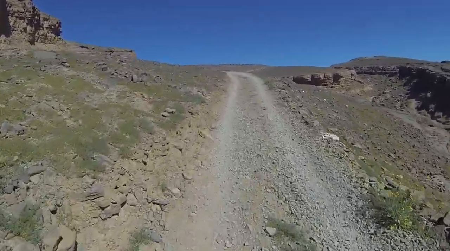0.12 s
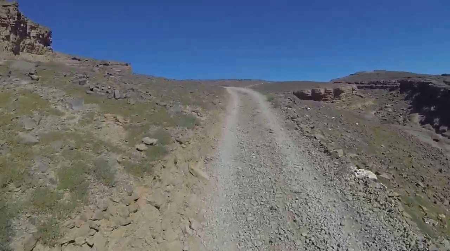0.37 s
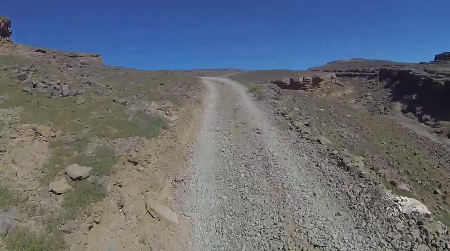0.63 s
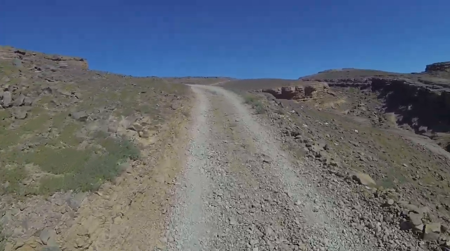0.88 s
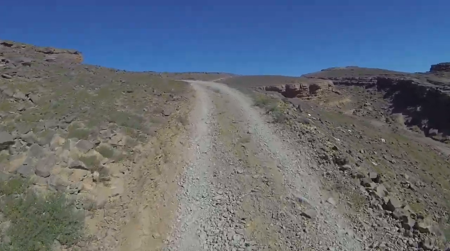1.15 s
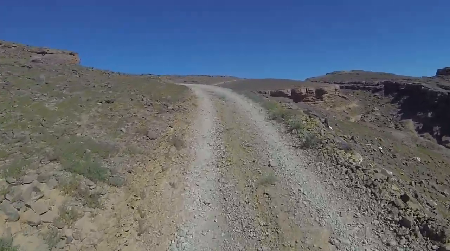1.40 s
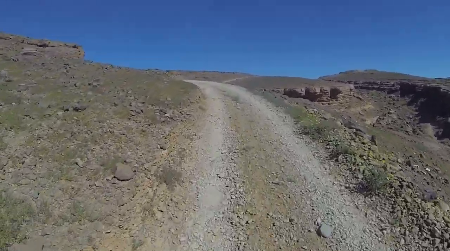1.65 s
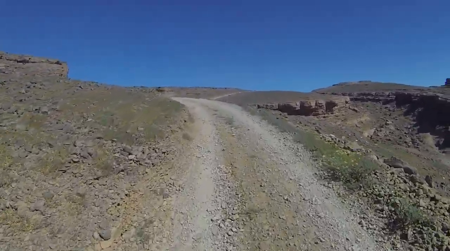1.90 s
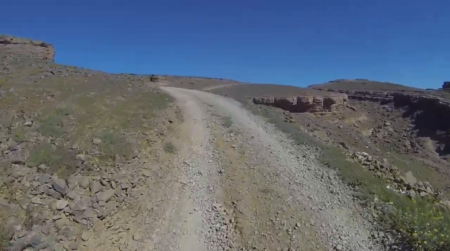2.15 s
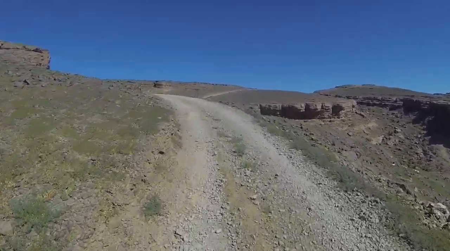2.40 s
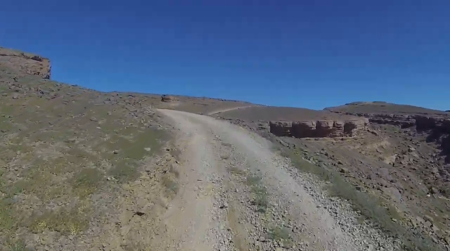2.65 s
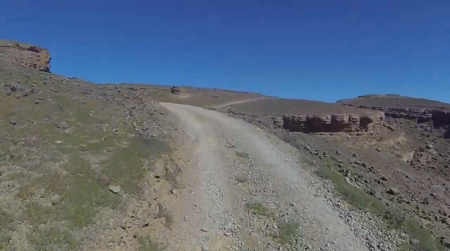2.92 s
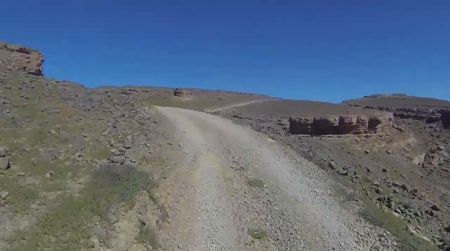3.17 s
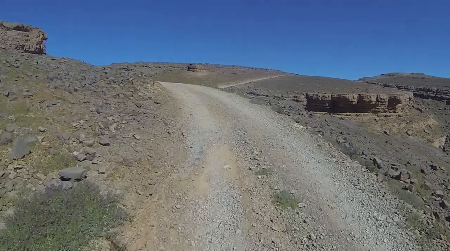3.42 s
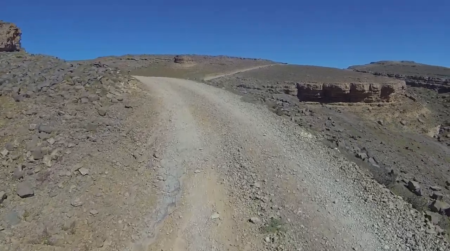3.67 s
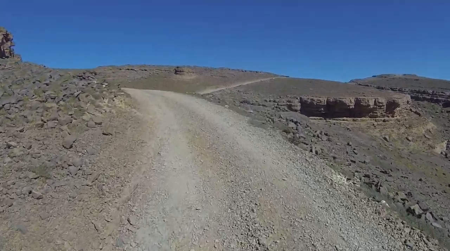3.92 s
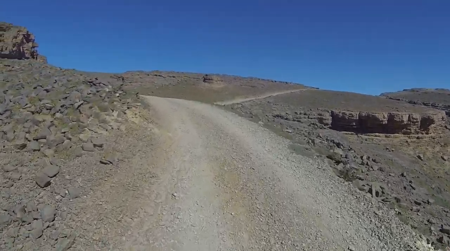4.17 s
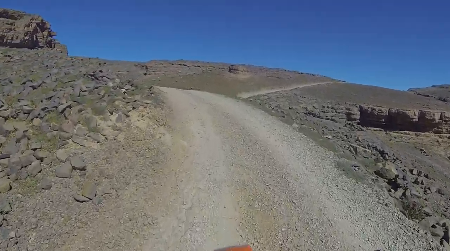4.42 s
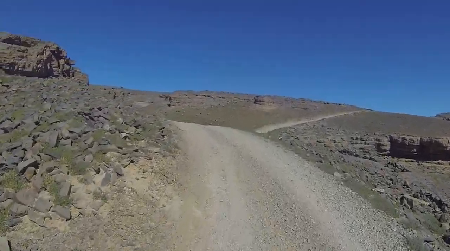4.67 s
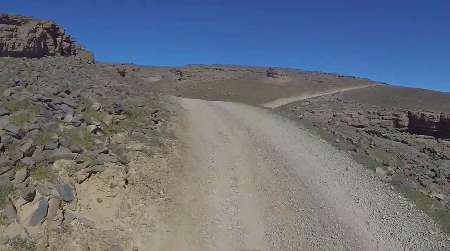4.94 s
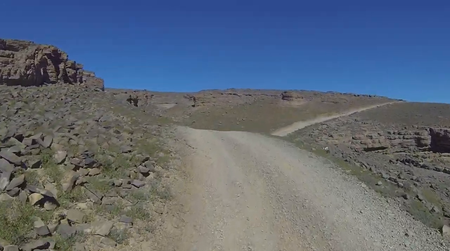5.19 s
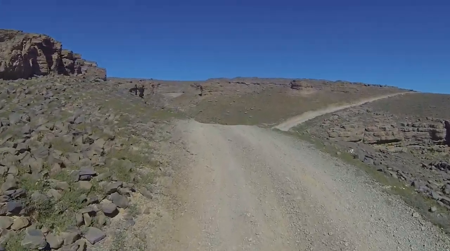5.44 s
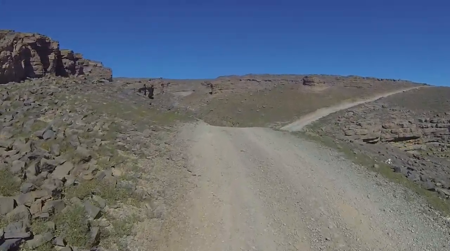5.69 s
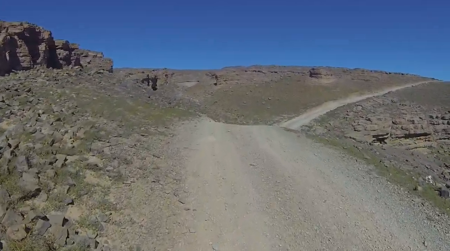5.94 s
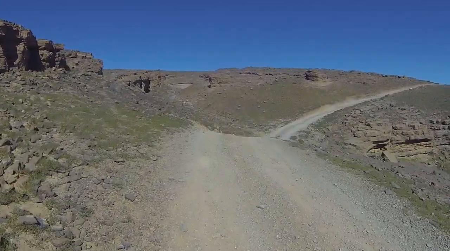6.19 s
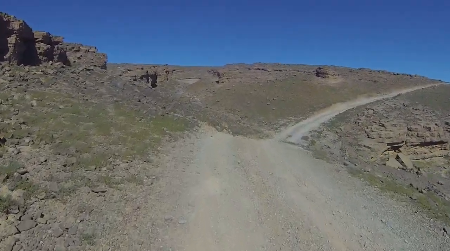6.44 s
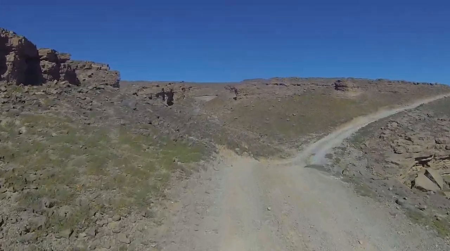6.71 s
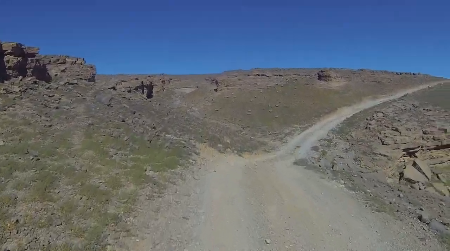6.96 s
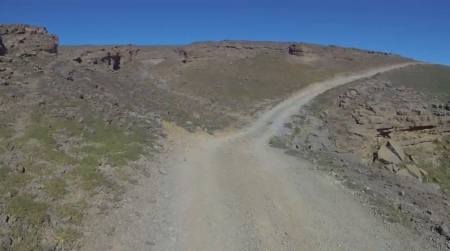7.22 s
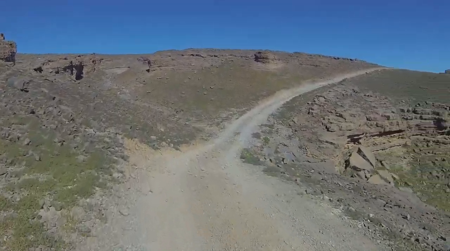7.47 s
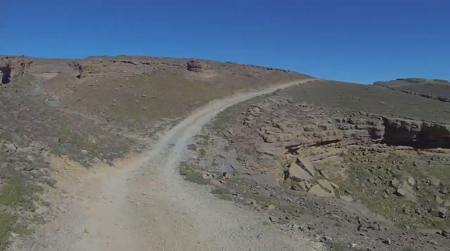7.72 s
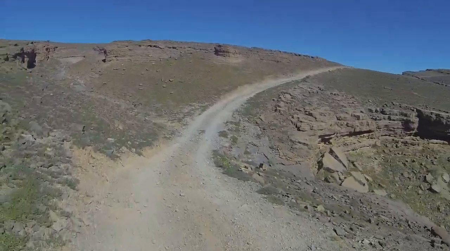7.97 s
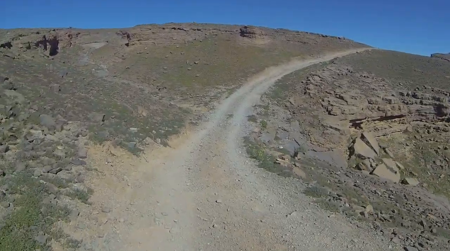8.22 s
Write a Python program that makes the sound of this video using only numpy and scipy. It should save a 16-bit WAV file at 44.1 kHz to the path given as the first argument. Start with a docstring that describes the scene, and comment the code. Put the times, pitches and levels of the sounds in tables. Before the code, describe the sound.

A motorcycle engine chugs throughout, heard from a microphone mounted on the bike, dry and without echo. Rapid rough exhaust bursts come first, then the throttle rises and falls as the revs sink, each firing becoming a distinct low thud. Loose gravel rumbles and rattles, stones click, and low knocks hit the frame. In the last stretch power is cut and the engine putters down with a hollow hum.

```python
"""A single-cylinder four-stroke motorcycle climbs a gravel track, slows and coasts, heard on board.
Each firing sets off short dying tones in the exhaust; a second pulse follows and damps the ring.
Under throttle, gas barks out as bursts of noise; the air intake gulps ahead of the next firing.
Below lie valve-gear clatter, tyre rumble, a buzzing panel and air-box hum, all made of filtered noise.
A few flung stones and knocks are brief bursts of noise, each around its own pitch."""
import sys
import numpy as np
from scipy import signal
from scipy.fft import rfft, irfft
from scipy.io import wavfile

SR = 44100
rng = np.random.default_rng(int(sys.argv[2]) if len(sys.argv) > 2 else 0)


def boost(x):
    """Linear amplitude factor 10**(x/20) for a level x in decibels (scalar or array-like)."""
    u = np.asarray(x, float) / 20
    return 10 ** u


def dump_mix(stems):
    """Bounce the given channels to the path in sys.argv[1] as a 16-bit WAV at rate SR."""
    frames = np.atleast_2d(stems).T  # one column per channel
    limited = np.clip(frames, -1, 1)  # hard clip at full scale
    pcm = np.round(limited * 32767).astype(np.int16)
    wavfile.write(sys.argv[1], SR, pcm)


N = 368235  # length of the sound in samples

# how fast the engine turns, from the first firing on: (t/s, speed/rpm)
SPEED = [(-0.0193, 2510.2), (0.21, 2732.2), (0.45, 2572.4), (0.51, 2782.1), (0.9, 3022.0), (1.89, 2788.5),
         (2.16, 2881.2), (2.24, 2694.8), (2.7, 2613.3), (2.91, 2411.3), (3.42, 2368.3), (3.49, 2214.5),
         (4.1, 2067.6), (4.52, 2118.4), (4.63, 1785.4), (4.8, 2386.4), (5.23, 1896.5), (5.59, 1978.9),
         (6.06, 1794.2), (6.13, 1745.5), (6.53, 1785.1), (6.78, 1633.2), (7.03, 1653.4), (7.48, 1488.1),
         (7.54, 1574.9), (8.4, 1441.7)]
# how it is ridden: (t/s, throttle/0-1, lugging/0-1 (labouring), exhaust strength/dB)
RIDE = [(0, 0.71, 0.8, -0.5), (.25, .95, 0.47, 1), (.75, 1, 0.06, -1), (1.1, .9, 0.3, -0.5),
        (1.3, 0.68, 0, -5), (1.55, 0.5, 0, -5), (1.8, 0.62, 0.16, -2), (2.13, 0.56, 0, 1.5),
        (2.3, 0.62, 0.32, -1), (2.7, 0.29, 0.4, -5), (3.0, 0.57, 0.88, 1.5), (3.25, 0.24, 0.74, -3),
        (3.75, 0.4, 0.84, 0.5), (4.25, 0.66, 0.86, 1.5), (4.6, 0.92, 1, 2), (4.85, 0.87, 0.86, 3),
        (5.05, 0.74, 0.95, 1.5), (5.25, 0.64, 1, -2), (5.6, 0.69, 0.92, 2.5), (6.1, 0.7, 0.98, -0.5),
        (6.68, 0.69, 0.96, 2), (6.74, 0, 0.7, -5), (7.05, 0, 0.3, -4.5), (7.3, 0, 0.18, -1),
        (7.75, 0, 0.23, 1), (8.35, 0, 0, 1)]
PUFF, GULP = 6, 7  # rows of the height table that bark() and intake() read
INTAKE_HZ = 571  # middle pitch of the air box


def in_time(rows, s):
    """Read each column of a table at the times s, on straight lines between its rows."""
    times, *columns = np.transpose(rows)
    return np.array([np.interp(s, times, column) for column in columns])


def rms_one(x):
    """Scale a sound to an average strength (rms) of 1."""
    return x / np.sqrt(np.mean(x ** 2) + 1e-20)


def drift(rate):
    """Smooth random wandering of spread 1; a higher rate (Hz) wanders faster."""
    r = np.exp(-80 * np.pi * rate / SR)  # one step is 40 samples
    draws = rng.standard_normal(N // 40 + 2002)
    slow = signal.lfilter([1], [1, -2 * r, r * r], draws)[2000:]
    return np.interp(np.arange(N) / 40, np.arange(len(slow)), rms_one(slow))


def band_noise(centre_hz, width_hz):
    """Noise through one narrow resonance, at rms 1."""
    edges = [centre_hz - width_hz / 2, centre_hz + width_hz / 2]
    sos = signal.butter(2, edges, "band", fs=SR, output="sos")
    return rms_one(signal.sosfilt(sos, rng.standard_normal(N)))


def coloured(x, spectrum, band):
    """Colour a noise by a spectrum, then scale it so that the part within the band (Hz, Hz) has rms 1."""
    hz = np.maximum(np.fft.rfftfreq(N, 1 / SR), 1)
    points = np.array(spectrum)
    colour_db = np.interp(np.log(hz), np.log(points[:, 0]), points[:, 1], left=-60, right=-120)
    bins = rfft(x) * boost(colour_db)
    inside = (hz > band[0]) & (hz < band[1])
    return irfft(bins, N) * N / np.sqrt(2 * np.sum(np.abs(bins[inside]) ** 2))


def lay(starts_s, shapes):
    """Sum short sounds, one per row, at their start times."""
    lead = SR // 10  # room for sounds that start before time 0
    first = np.round(starts_s * SR).astype(int)[:, None]
    at = first + np.arange(shapes.shape[1]) + lead
    return np.bincount(at.ravel(), shapes.ravel(), N + SR)[lead:lead + N]


def firings(jitter_s):
    """Times of all firings, one in two turns of the crank, each a little early or late by chance."""
    s = SPEED[0][0] + np.arange(N + SR // 20) / SR
    cycles = np.cumsum(in_time(SPEED, s)[0]) / (120 * SR)  # rpm / 120 = firings per second
    fired = np.interp(np.arange(int(cycles[-1]) + 1), cycles, s)
    return fired + jitter_s * rng.standard_normal(len(fired))


def by_throttle(values, s):
    """Read a value given for the throttle shut, half open and wide open."""
    return np.interp(in_time(RIDE, s)[0], [0, .5, 1], values)


def heights_db(s):
    """Height of every part of the exhaust note and intake, from throttle, lugging and strength."""
    # rows: thump, boom, knock, pipe pair, upper ring, second pulse, puff of gas, intake gulp
    # (level when shut/dB, when half open/dB, when wide open/dB, change when lugging/dB)
    response = [(-4.5, -8, -19.5, -4.5), (0.5, -16.5, -19, -8.5), (-20.5, -32, -34, 36), (9, 2.5, 4, 2.5),
                (-39, -17.5, -9.5, -6), (1.5, -2.5, -10, -4.5), (-65.5, -40.5, -29, 0),
                (-23.5, -49, -50, -4.5)]
    _, lugging, strength_db = in_time(RIDE, s)
    return np.array([by_throttle(row[:3], s) + row[3] * lugging + strength_db for row in response])


def rumble(turn, level_db, swell_db):
    """Tyres and frame shaking: low lumpy noise that swells once per engine cycle."""
    # colour of the low noise: (f/Hz, relative level/dB per Hz)
    rumble_spectrum = [(20, -7.5), (50, -5), (120, 5), (170, -2), (230, -0.5), (330, -2), (420, -5.5),
                       (560, -5.5), (700, -12), (900, -11), (1300, -26)]
    noise = coloured(rng.standard_normal(N), rumble_spectrum, (450, 1000))
    swell = swell_db * np.cos(2 * np.pi * (turn - .15))
    return boost(level_db + swell + 1.1 * drift(11)) * noise


def airbox(now):
    """Air drawn in hums through the air box's resonance, loudest with the throttle shut."""
    hum_db = by_throttle((-39.5, -49.5, -51), now)
    return boost(hum_db) * band_noise(INTAKE_HZ, width_hz=74)


def panel(now):
    """A panel buzzes: noise through one narrow resonance, loudest where the engine speed suits it."""
    best_rpm, range_rpm = 2400, 197
    off = (in_time(SPEED, now)[0] - best_rpm) / range_rpm
    level_db = -44.5 + 11.5 * np.exp(-off ** 2 / 2)
    return boost(level_db) * band_noise(695, width_hz=80)


def clatter(turn, level_db, swell_db, flicker_db):
    """Valve gear, chain and gravel: grainy hiss swelling once a cycle; low, middle and top flicker apart."""
    # colour of the hiss: (f/Hz, relative level/dB per Hz)
    clatter_spectrum = [(470, -45.5), (800, -13), (938, -5), (1030, 0), (1310, -6.5), (1420, -8),
                        (1890, -4.5), (2760, -14.5), (3160, -10.5), (4730, -23.5), (5150, -25.5),
                        (7530, -38), (8620, -33.5), (10700, -39), (15000, -55)]
    grain = rng.standard_normal(N) * boost(2.0 * drift(300))
    noise = coloured(grain, clatter_spectrum, (1200, 5000))
    low, upper = [signal.sosfiltfilt(signal.butter(2, hz, fs=SR, output="sos"), noise)
                  for hz in (2600, 6500)]
    parts = low, upper - low, noise - upper
    mixed = sum(part * boost(flicker_db * drift(15)) for part in parts)
    return boost(level_db + swell_db * np.cos(2 * np.pi * (turn - .15))) * mixed


def stones():
    """Stones and knocks against the frame: each is a dying burst of noise around its own pitch."""
    # (t/s, peak level/dB, f/Hz, relative width/1, time to die by 60 dB before filtering/s)
    stone_hits = [(1.913, -38.5, 9050, 0.37, 0.0063), (1.933, -48, 9550, .3, 0.0053),
                  (1.989, -30.5, 5230, 0.066, 0.041), (2.390, -9, 433, 0.27, 0.021),
                  (3.030, -41, 4000, 0.29, 0.025), (3.33, -22.5, 3010, 0.54, 0.12),
                  (3.530, -28, 3540, .2, 0.025), (3.383, -37.5, 9970, 0.19, 0.0033),
                  (4.807, -13, 420, 0.53, 0.017), (4.986, -48, 6000, 0.24, .01),
                  (5.263, -12.5, 393, 0.38, 0.0057), (5.549, -11.5, 397, 0.44, .02),
                  (6.582, -20.5, 890, 0.22, 0.011), (7.461, -51, 9800, 0.16, .03),
                  (7.850, -60, 10800, 0.072, .03), (7.927, -53, 11300, .05, 0.033),
                  (8.247, -57, 11200, 0.036, .03)]
    out, t = np.zeros(N), np.arange(SR // 20) / SR
    for s, db, hz, width, t60 in stone_hits:
        edges = [hz / (1 + width), hz * (1 + width)]
        sos = signal.butter(2, edges, "band", fs=SR, output="sos")
        burst = rng.standard_normal(len(t)) * boost(-60 * t / t60)
        burst = signal.sosfilt(sos, signal.sosfilt(sos, burst))
        out[round(s * SR):][:len(t)] += boost(db) * burst / np.abs(burst).max()
    return out


def intake(fired, lead, t60, rasp_db):
    """A short ring of the air box with a rasp of air, a share of the cycle ahead of the next firing."""
    begins = fired[1:] - lead * np.diff(fired)
    t = np.arange(SR // 6) / SR
    chance = rng.standard_normal((len(begins), 2, 1))
    pitch = INTAKE_HZ * (1 + 0.032 * chance[:, 0])
    height = boost(heights_db(begins)[GULP][:, None] + 0.58 * chance[:, 1])
    swelling = height * (1 - np.exp(-t / .002))
    ring = lay(begins, swelling * boost(-60 * t / t60) * np.sin(2 * np.pi * pitch * t))
    sos = signal.butter(3, [750, 1600], "band", fs=SR, output="sos")
    air = rms_one(signal.sosfilt(sos, rng.standard_normal(N)))
    return ring + air * lay(begins, swelling * boost(rasp_db - 60 * t / .3))


def bark(fired, hold, fade, uneven_db):
    """Turbulent gas leaves with each firing: a sharp front, then a puff that lasts a share of the cycle."""
    # colour of the gas noise: (f/Hz, relative level/dB per Hz)
    gas_spectrum = [(290, -34), (500, -4), (593, -6.5), (646, -15.5), (713, -3), (1300, -6.5), (2040, -4),
                    (2750, -16), (3090, -10), (3820, -16.5), (6020, -36), (10800, -47.5), (15000, -59.5)]
    # harder cracks of gas: (t/s, level above the neighbours/dB)
    hard_cracks = [(.12, 10), (.482, 2.5), (.53, 5), (.568, 3), (.611, 4.5), (.652, 3), (.694, 3.5),
                   (.735, 8), (.896, 3.5), (1.016, 5), (1.098, 4), (1.59, 9.5), (1.931, 3.5), (2.14, 0),
                   (2.77, 13), (3.064, 3), (3.259, 6), (4.2, 5), (4.607, 3), (4.675, 1.5), (4.784, 3),
                   (4.837, 0.5)]
    crack_spread_s = .03
    t = np.arange(SR // 10) / SR
    share = t / np.gradient(fired)[:, None]  # of one cycle
    puff = boost(-60 * np.maximum(share - hold, 0) / fade)
    puff = puff * (1 - np.exp(-t / .0003)) * (1 + .6 * np.exp(-t / .003))  # sharp front
    chance = rng.standard_normal((len(fired), 1))
    extra_db = sum(db * np.exp(-((fired - s) / crack_spread_s) ** 2) for s, db in hard_cracks)
    puff_db = (heights_db(fired)[PUFF] + extra_db)[:, None] + uneven_db * chance
    gate = lay(fired + 0.00066, puff * boost(puff_db))

    grain = rng.standard_normal(N) * boost(2.1 * drift(310))
    gas = coloured(grain, gas_spectrum, (1200, 5000))
    body = signal.sosfiltfilt(signal.butter(2, 3000, fs=SR, output="sos"), gas)
    lugging = in_time(RIDE, np.arange(N) / SR)[1]
    rasp_db = -1 * lugging + 1 * drift(7.6)  # the treble wanders and is duller when lugging
    return gate * (body + boost(rasp_db) * (gas - body))


def exhaust(fired, uneven_db, detune):
    """Dying tones (modes) per firing; the hot ones die fast once the second pulse has passed."""
    # (f/Hz before heating, time to die by 60 dB/s before throttle scaling, start/ms, sign/+-1,
    # added level/dB, height row/number, follows gas heat/0-1, struck by the second pulse/0-1)
    modes = [(44.1, .116, 7.0, -1, 0, 0, 0, 1), (85.8, .095, 1.3, 1, 0, 1, 0, 0),
             (130, .021, 3.1, 1, 0, 2, 1, 0), (201, .049, -1.27, -1, 0, 3, 1, 0),
             (230.5, .040, -1.13, 1, -3, 3, 1, 0), (336, .10, -2.87, -1, 1, 4, 1, 0),
             (364, .07, -2.87, -1, -7, 4, 1, 0), (80.9, .058, 0, 1, 0, 5, 0, 1),
             (235, .05, 1.8, 1, -9, 1, 0, 1)]
    # pitch of the pipe as the gas heats and cools: (t/s, f/Hz)
    pipe_pitch = [(0.0, 266), (0.04, 265.7), (0.67, 252.7), (1.02, 270.6), (1.51, 267.5), (1.6, 272),
                  (3.49, 253.8), (3.53, 242.7), (5.16, 245.6), (5.32, 241.7), (6.7, 237.6), (6.86, 230),
                  (8.28, 249.5), (8.35, 226)]
    # how the hot tones' dying time scales: (when shut/1, when half open/1, when wide open/1)
    ring_length = (0.51, 0.94, 0.71)
    # wait for the second pulse, in shares of a cycle: (when shut/1, when half open/1, when wide open/1)
    lag_share = (.222, .19, .165)
    rise_s, shut_ms, shut_per_s = .001, 12, 790  # shut: the extra damping after the second pulse
    heat = in_time(pipe_pitch, fired).T / 201.9  # against the cold pipe's pitch in Hz
    length = by_throttle(ring_length, fired)[:, None]
    lag_ms = 1000 * (by_throttle(lag_share, fired) * np.gradient(fired))[:, None]
    level_db = heights_db(fired)[..., None]
    early = .008  # s; some modes start before the firing time
    age = np.arange(SR // 6) / SR - early
    shut = np.exp(-shut_per_s * np.maximum(age - (lag_ms + shut_ms) / 1000, 0))
    strength = rng.standard_normal((len(fired), 1))  # chance shared by all modes of a firing
    out = 0
    for hz, t60, start_ms, sign, db, row, hot, second in modes:
        chance = rng.standard_normal((len(fired), 2, 1))
        t = np.maximum(age - (start_ms + second * lag_ms) / 1000, 0)
        pitch = hz * heat ** hot * (1 + detune * chance[:, 0])
        decay = boost(-60 * t / (t60 * length ** hot)) * shut ** hot
        envelope = (1 - np.exp(-t / rise_s)) * decay
        height = sign * boost(db + level_db[int(row)] + uneven_db * (strength + chance[:, 1]))
        out = out + height * envelope * np.sin(2 * np.pi * pitch * t)
    return lay(fired - early, out)


def scene():
    """Mix all the layers; those tied to the engine share one crank."""
    # roughness of the track, heard as clatter: (t/s, level before a small lift/dB)
    track = [(0.0, -35.5), (0.39, -42), (0.74, -37.5), (1.3, -39.5), (2.04, -35.5), (2.44, -37),
             (3.37, -36), (4.02, -41.5), (4.47, -42.5), (4.84, -40.5), (5.18, -42), (6.93, -45.5),
             (7.49, -42), (8.35, -41)]
    # change of the rumble: (when shut/dB, when half open/dB, when wide open/dB)
    rumble_change = (-0.5, 0.4, -0.4)
    now = np.arange(N) / SR
    fired = firings(jitter_s=0.00029)
    turn = np.interp(now, fired, np.arange(len(fired)))  # engine cycles so far
    lugging = in_time(RIDE, now)[1]
    track_db, = in_time(track, now)
    rumble_db = -34.5 + 0.69 * (track_db - track_db.mean())
    rumble_db = rumble_db + by_throttle(rumble_change, now)

    background = rumble(turn, rumble_db, swell_db=2.5) + airbox(now) + panel(now)
    rattle = clatter(turn, track_db + 0.5, swell_db=0.68 + 1.5 * lugging, flicker_db=1.0)
    gulps = intake(fired, lead=.25, t60=.12, rasp_db=-10)
    puffs = bark(fired, hold=0.23, fade=0.95, uneven_db=1.4)
    ring = exhaust(fired, uneven_db=.6, detune=.006)
    return (background + rattle + stones() + gulps + puffs + ring)[None]


def top_cut(x):
    """Nothing passes above the cut-off."""
    return signal.sosfilt(signal.butter(12, 15110, fs=SR, output="sos"), x)


def record(dry):
    """The microphone loses the deepest bass and slightly rounds the peaks."""
    cut = signal.lfilter(*signal.butter(1, 6, "high", fs=SR), dry)
    rounded = 1.537 * np.tanh(cut / 1.754)
    return top_cut(rounded)


dry = scene()
out = record(dry)
dump_mix(out)
```